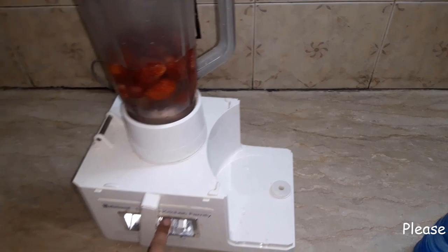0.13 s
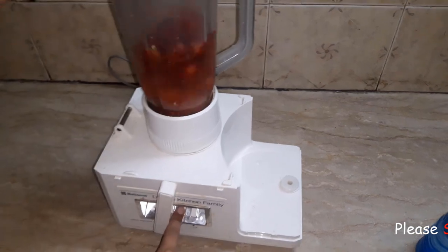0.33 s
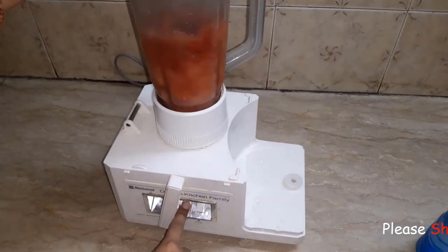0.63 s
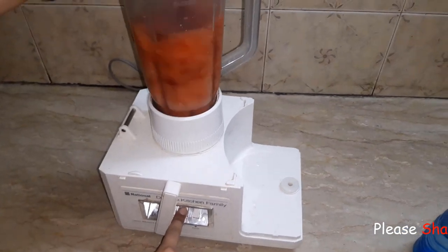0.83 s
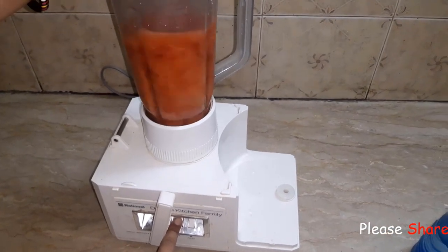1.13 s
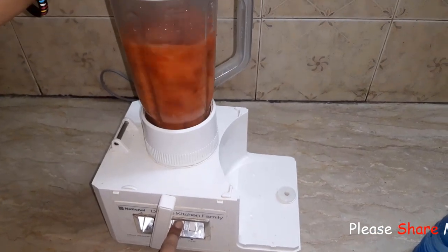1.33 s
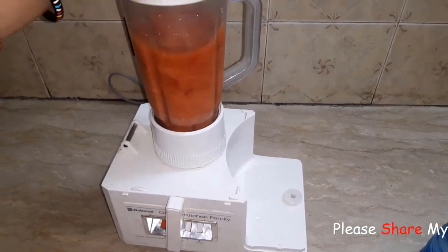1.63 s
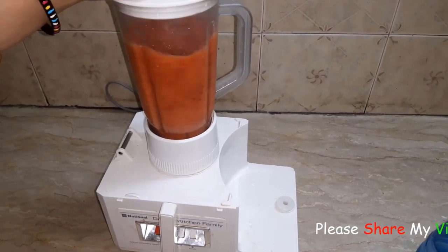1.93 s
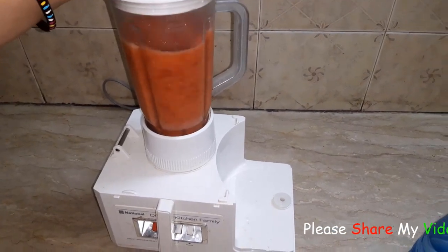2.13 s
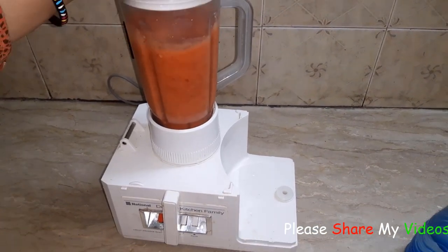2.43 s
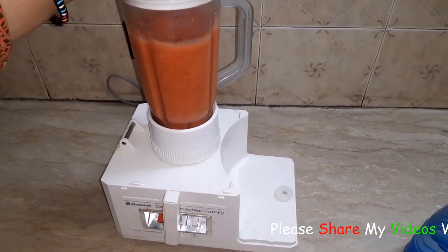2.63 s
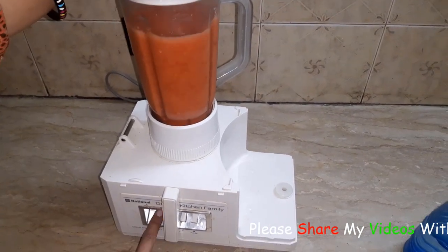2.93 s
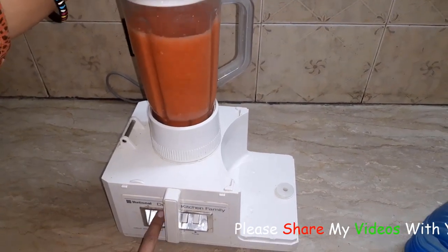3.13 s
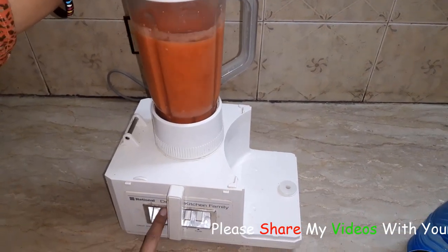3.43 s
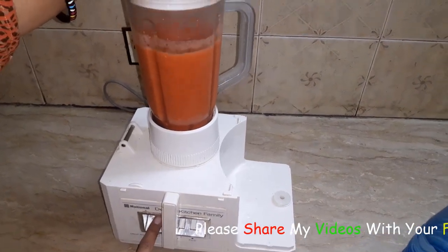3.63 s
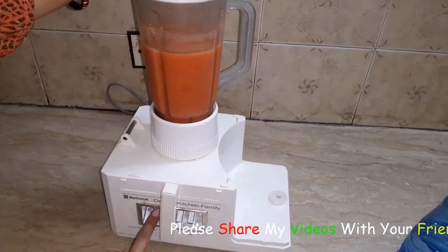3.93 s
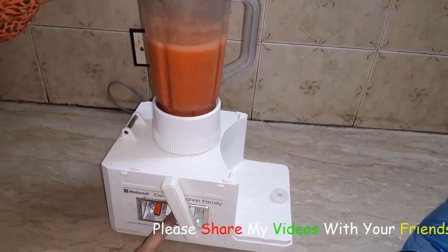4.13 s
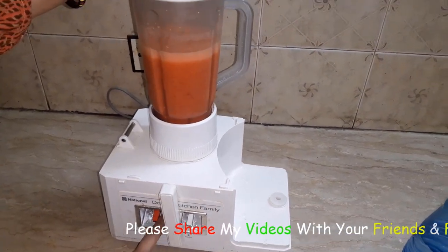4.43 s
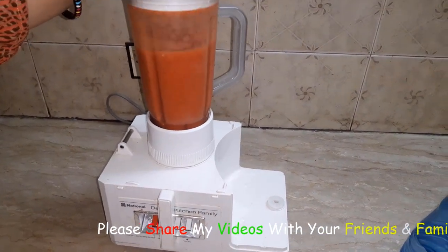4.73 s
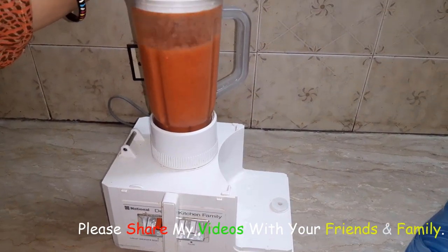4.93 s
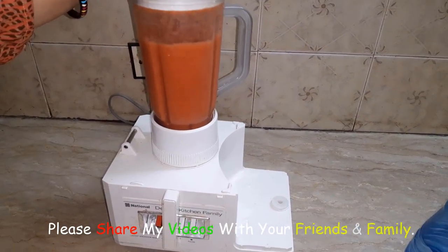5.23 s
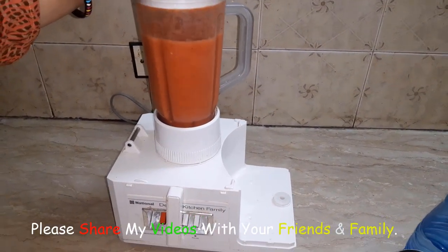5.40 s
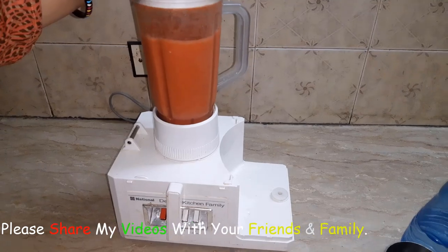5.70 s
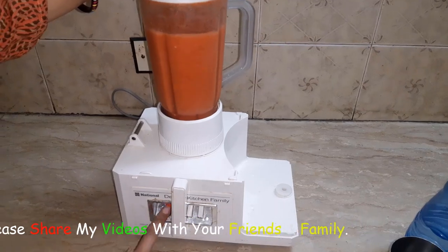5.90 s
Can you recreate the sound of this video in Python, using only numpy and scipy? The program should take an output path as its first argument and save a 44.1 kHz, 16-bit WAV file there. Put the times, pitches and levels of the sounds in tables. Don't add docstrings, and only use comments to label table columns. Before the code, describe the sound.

A blender is heard nearby on a kitchen counter, with short room reflections. First comes a low, uneven motor growl with irregular fruit knocks, wet splashes and tiny ticks. Suddenly the sound is sped up into a smooth, high whine and rushing fan air. It stops, coasting down with loose rattles and hiss; plastic buttons click over faint fridge hum, a far horn toots, then the motor jolts on and settles into a slower whir.

```python
import sys
import numpy as np
from scipy import signal
from scipy.fft import rfft, irfft, next_fast_len
from scipy.io import wavfile
from scipy.ndimage import uniform_filter1d

SR = 44100
rng = np.random.default_rng(int(sys.argv[2]) if len(sys.argv) > 2 else 0)


def unload_wav(signal):
    wavfile.write(
        sys.argv[1],
        SR,
        np.round(np.clip(np.atleast_2d(signal).T, -1, 1) * 32767).astype(np.int16),
    )


def volts_from_db(level):
    exponent = np.asarray(level, float) / 20
    return 10 ** exponent


N = 267270
T = np.arange(N) / SR
SIZE = next_fast_len(N + SR)
HZ = np.maximum(np.arange(SIZE // 2 + 1) * SR / SIZE, 1)
TOP_HZ = 15720
MAINS_HZ = 50
NORMAL, SPEED_UP = 1, 3.5
CHOP_ON_S, CUT_S, HIGH_OFF_S, REST_S, LOW_ON_S = .188, 1.4605, 3.31, 3.822, 4.482
REST_DB_S = -130


def unit(x):
    return x / np.sqrt(np.mean(x ** 2))


def since(s):
    return np.maximum(T - s, 0)


def gate(start_s, end_s):
    return uniform_filter1d(1. * (T > start_s) * (T < end_s), size=130)


def add(out, s, length_s, shape):
    span = slice(int(s * SR), int((s + length_s) * SR))
    out[:, span] += shape(T[span] - T[span][0], span)


def on_hz(points):
    hz, db = np.transpose(points)
    return volts_from_db(np.interp(np.log(HZ), np.log(hz), db))


def on_time(table):
    s, *columns = np.transpose(table)
    return [np.interp(T, s, column) for column in columns]


def colour(x, points, modes=(), broad_db=0.):
    power = (on_hz(points) * volts_from_db(broad_db)) ** 2
    for hz, width, db in modes:
        power = power + volts_from_db(2 * db) / (1 + (2 * (HZ - hz) / width) ** 2) ** 2
    cepstrum = irfft(np.log(power + 1e-14), SIZE)
    cepstrum[0] /= 2
    gain = np.exp(rfft(cepstrum[:SIZE // 2], SIZE))
    return unit(irfft(rfft(x, SIZE) * gain, SIZE)[..., :N])


def high_pass(x, order, hz):
    return signal.sosfilt(signal.butter(order, hz, "high", fs=SR, output="sos"), x)


def walk(rate):
    k = int(SR / rate)
    held = np.repeat(rng.standard_normal(N // k + 1), k)
    return unit(uniform_filter1d(uniform_filter1d(held, k), k)[:N])


def churn(rate, scatter_db, smear_ms, share, flicker_db, flicker_rate):
    where, size = rng.random(N), rng.exponential(size=N)
    hiss = rng.standard_normal((2, N))
    strikes = (where < rate / SR) * volts_from_db(np.minimum(size, 4) * scatter_db)
    puffs = signal.lfilter([1], [1, -np.exp(-1000 / smear_ms / SR)], strikes)
    return hiss * (share * unit(puffs) + 1 - share) * volts_from_db(flicker_db * walk(flicker_rate))


# f/Hz, level/dB
QUIET = [(15, -40), (25, -7), (118, -2), (253, -8.5), (340, -9), (404, -17.5), (557, -15), (1380, -31.5),
         (2320, -25.5), (2760, -36), (5240, -36.5), (9000, -56.5), (13000, -48), (15600, -54)]
QUIET_FAST = [(24, -85), (40, -50), (180, -9), (283, -18), (351, -2), (593, -16.5), (1030, -12),
              (1100, -16.5), (1740, -26.5), (1870, -21), (3000, -30), (4000, -42), (8190, -42),
              (10200, -45), (11000, -59.5), (15600, -100), (22000, -120)]


def quiet_kitchen(points, level_db):
    return volts_from_db(level_db) * colour(rng.standard_normal((2, N)), points)


def hum(speed, db):
    return volts_from_db(db + 0.76 * walk(8 * speed)) * np.sin(4 * np.pi * MAINS_HZ * speed * T)


# f/Hz, level/dB re middle
WIDE = [(60, -34), (110, -31), (200, -21), (380, -1.5), (700, -3.5), (1290, 1), (2380, -7.5), (4400, 2.5),
        (8120, 4.5), (15000, 6)]
WIDE_FAST = [(60, -11), (110, -14), (200, -24), (380, -12), (700, -26), (1290, 0), (2380, -1), (4400, 1.5),
             (8120, 2), (15000, 3.5)]
# f/Hz, level/dB
LEAN = [(60, -14), (110, 8.5), (200, -4.5), (380, 1), (700, -0.5), (1290, 0), (2380, -6), (4400, -3.5),
        (8120, -2.5), (15000, -26)]
LEAN_FAST = [(60, 7), (110, -13.5), (200, 2.5), (380, 0.5), (700, -4.5), (1290, -0.5), (2380, 0.5),
             (4400, 0.5), (8120, -4.5), (15000, -0.5)]


def kitchen(x, speed, wide, lean):
    t60_s, room_db, wide_db, port_lag_ms = .5, -9, -4, 0.088
    age = np.arange(SR // 2) / SR
    tail = rng.standard_normal((2, SR // 2)) * volts_from_db(-60 * age * speed / t60_s)
    tail = rfft(tail / np.sqrt(np.sum(tail ** 2, axis=1, keepdims=True)), SIZE)
    cut = (1j * HZ / (1j * HZ + 52 * speed)) ** 3
    mid, side = rfft(x, SIZE) * cut * (1 + volts_from_db(room_db) * tail)
    side = volts_from_db(wide_db) * on_hz(wide) * side
    tilt = np.sqrt(on_hz(lean)) * np.exp(1j * np.pi * HZ * port_lag_ms / 1000 / speed)
    return irfft(np.array([(mid + side) * tilt, (mid - side) / tilt]), SIZE)[:, :N]


# t/s, duration/s, f/Hz, sag/(Hz/s), level/dB
HORN = [
    (4.25, .03, 2300, -5000, -57),
    (4.275, .045, 2500, 0, -49),
    (4.318, .024, 1885, 250, -46),
    (4.345, .045, 1880, 200, -43.5),
    (4.392, .016, 1870, 200, -47),
    (4.41, .055, 1850, 200, -55),
    (4.322, .075, 2495, 0, -63),
    (4.295, .055, 3740, 300, -64),
    (4.33, .1, 2800, 550, -63),
    (4.32, .1, 940, 100, -58),
]


def horn():
    attack_s, fade_db_s = .012, -85
    out = 0
    for s, length_s, hz, sag, db in HORN:
        age = since(s)
        phase = 2 * np.pi * (hz - sag * age / 2) * age
        shape = gate(s, s + length_s) * np.minimum(age / attack_s, 1) * volts_from_db(db + fade_db_s * age)
        out = out + shape * volts_from_db(2. * walk(140)) * np.sin(phase + .7 * walk(170))
    return out


# f/Hz, level/dB
RUSTLE = [(1200, -28), (2000, -1.5), (2500, -4), (3300, -7), (4000, -22), (5200, -14), (7000, -25)]


def rustle():
    level = volts_from_db(-66 + 2.97 * walk(60)) * gate(-1, 0.066)
    return level * colour(rng.standard_normal((2, N)), RUSTLE)


# f/Hz, level/dB
RATTLE = [(150, -11), (250, -14), (997, 0.5), (1650, -8.5), (2130, -11), (3070, -5), (3650, -9),
          (5920, -18.5), (7680, -15), (9450, -21), (15600, -30)]
# t/s, peak level/dB, ring f/Hz,
# ring/cycles, rattle level/dB re peak
BUTTONS = [(0.0909, -25.5, 770, 8.6, -27.5), (0.0918, -26.5, 208, 4, -34.5), (0.1, -38, 900, 4, -22),
           (.1212, -36, 772, 9.3, -31), (0.1217, -41, 1300, 5, -18), (0.129, -49, 1200, 3, -22),
           (1.505, -27.5, 350, 3, -5.5), (3.314, -32, 1350, 210, -25), (3.432, -33, 2480, 110, -23),
           (3.505, -39, 3110, 170, -14), (3.517, -36, 3020, 170, -14), (4.1252, -35, 2980, 49, -8),
           (4.145, -47, 1250, 17, -2.5), (4.1286, -31, 7750, 47, -20), (4.146, -36, 2200, 12, -24),
           (4.2255, -43.5, 820, 25, -5.5), (4.2247, -37, 7900, 40, -17), (4.226, -51, 4300, 60, -20),
           (4.2897, -59, 7000, 40, -1), (4.319, -65, 6000, 40, -0.5), (4.331, -69, 4800, 40, -3),
           (4.471, -44, 1800, 7.7, -13), (4.482, -26, 686, 30, -7.5), (4.4893, -15, 770, 20, -13),
           (4.489, -12, 1730, 13, -12), (4.4925, -16, 850, 14, -15), (4.497, -18, 900, 15, -14.5),
           (4.5002, -8, 830, 12, -15), (4.508, -11.5, 750, 15, -11.5), (4.537, -18, 850, 15, -7.5),
           (4.553, -25, 900, 16, -3.5), (4.5668, -24, 1050, 6.2, -10), (4.5676, -20, 3000, 14, -8),
           (4.575, -24, 950, 12, -15), (4.585, -19.5, 1050, 27, -11)]


def buttons():
    out, rattle = np.zeros((2, N)), colour(rng.standard_normal((2, N)), RATTLE)
    for s, db, hz, cycles, rattle_db in BUTTONS:
        rattle_ms = max(215 + 15 * rattle_db, 22)
        add(out, s, .25, lambda age, k: volts_from_db(db - 60 * age * hz / cycles) * np.sin(2 * np.pi * hz * age)
            + volts_from_db(db + rattle_db - 60000 * age / rattle_ms) * rattle[:, k])
    return out


# t/s, peak level/dB
PIPS = [(0.2728, -20.5), (.337, -23.5), (.346, -28.5), (.355, -32), (.26, -33), (.4922, -35), (.5036, -30),
        (.9466, -38), (.9656, -31), (1.0428, -31), (1.0763, -35), (1.275, -30.5), (1.3562, -31.5)]


def pips():
    out, hiss = np.zeros((2, N)), high_pass(rng.standard_normal((2, N)), 4, 11000)
    for s, db in PIPS:
        add(out, s, .02, lambda age, k: volts_from_db(db - 60000 * age / 8.6) * hiss[:, k])
    return out


# t/s, duration/s, f/Hz, level/dB
HEAVES = [
    (.35, 0.043, 190, -25),
    (0.378, 0.1, 240.5, -30),
    (0.504, 0.14, 288, -33),
    (0.66, 0.069, 307, -31),
    (0.698, 0.15, 267, -29),
    (0.995, 0.042, 290, -28.5),
]


def heaves():
    out, shake = np.zeros((2, N)), volts_from_db(1.5 * walk(40))
    for s, length_s, hz, db in HEAVES:
        add(out, s, length_s * 1.2, lambda age, k: volts_from_db(db + 1.5) * shake[k]
            * np.sin(np.pi * age / age[-1]) * np.sin(2 * np.pi * hz * age))
    return out


# f/Hz, level/dB
SLOSH = [(120, -36.5), (200, -28.5), (314, -26.5), (347, -17.5), (379, -21.5), (774, -10.5), (911, -6.5),
         (1430, -11.5), (1770, -20.5), (4000, -21.5), (5200, -57.5), (8800, -120)]
# f/Hz, width/Hz, level/dB
SEAT_MODES = [(835, 35, -2), (921, 40, 4), (1030, 45, -6), (1110, 35, -10), (1250, 40, -9), (1390, 40, -6)]


def chatter():
    peak_s = 3.68
    knocks = colour(churn(400, 2., 3., .35, 1.5, 45), SLOSH, SEAT_MODES, -13.)
    db = -46 - 50 * np.maximum(peak_s - T, 0) - 36 * since(peak_s) + REST_DB_S * since(REST_S)
    return gate(HIGH_OFF_S, REST_S + 0.13) * volts_from_db(db) * knocks


# t/s, peak level/dB, ring f/Hz
ROCKS = [(3.348, -27, 956), (3.382, -34, 1160), (3.435, -39, 990), (3.465, -22.5, 890), (3.518, -40, 980),
         (3.533, -36, 1390), (3.561, -29, 950), (3.578, -23, 920), (3.595, -27, 1045), (3.637, -26, 929),
         (3.65, -30, 934), (3.673, -31, 923), (3.712, -36, 1020), (3.724, -27, 907), (3.742, -27, 882),
         (3.757, -35, 1400), (3.775, -29, 890), (3.8, -33, 866), (3.83, -34, 835), (3.87, -41, 905)]


def rocks():
    rise_s = 0.0053
    out, wobble = np.zeros((2, N)), .4 * walk(250)
    for s, db, hz in ROCKS:
        add(out, s - .003, .1, lambda age, k: volts_from_db(db - 5.5) * age / rise_s * np.exp(1 - age / rise_s)
            * np.sin(2 * np.pi * hz * age + wobble[k]))
    return out


def high_shaft():
    from_hz, top_hz, climb_s, coast_s, friction_hz = 641, 703.5, .28, .595, 300
    climb = top_hz - (top_hz - from_hz) * np.exp(-since(CUT_S) / climb_s)
    coast = np.exp(-since(HIGH_OFF_S) / coast_s)
    return np.maximum((climb + friction_hz) * coast - friction_hz, 5), top_hz


# f/Hz, level/dB
BRUSH = [(4500, -42), (7500, -3), (10500, -7), (12500, -5), (15600, -12)]


def brushes():
    bar_hz = 10.35 * high_shaft()[0]
    phase = 2 * np.pi * np.cumsum(bar_hz) / SR
    whine = sum((k * bar_hz < TOP_HZ) * volts_from_db(3.0 * walk(25)) * np.sin(k * phase) for k in range(3, 10))
    late = np.clip(since(HIGH_OFF_S + 0.23) / .1, 0, 1)
    hiss = volts_from_db(-51.5) * colour(rng.standard_normal((2, N)), BRUSH)
    sound = hiss + volts_from_db(-69) * late * colour(whine * gate(3.5, 3.9), BRUSH)
    fade = volts_from_db(-18 * since(HIGH_OFF_S) - 60 * since(REST_S))
    return gate(HIGH_OFF_S, REST_S + 0.18) * fade * sound


# shaft multiple, mains multiple, level/dB re shaft line when chopping, on high, on low
LINES = [(1, 0, 3, -0.5, 0), (0, 2, -8.5, -65, -22), (1, -1, -34, -55, -13), (1, 1, -23, -45, -6.5),
         (1, 2, -44, -9.5, -3), (2, -1, -6, -22.5, 0), (2, 0, -6.5, -4.5, 2.5), (2, 1, -10, -48, -3.5),
         (2, 2, -28.5, -17.5, -34), (3, 0, -5.5, -13.5, -1.5), (3, 1, -26, -25, -32), (3, 2, -37, -16, -33),
         (4, 0, -6, -12, 3), (5, -1, -6, -33, -34), (5, 0, -5.5, -24, -7), (5, 2, -7, -27, -29),
         (6, 0, -11, -7.5, -12), (8, 0, -13.5, -8, -9), (10, 0, 1, -6, -25), (12, 0, -14, -18, 2.5)]


def armature(shaft_hz, line_db, speed, axis, waver_db):
    shaft = 2 * np.pi * np.cumsum(shaft_hz) / SR
    mains = 2 * np.pi * MAINS_HZ * speed * T
    glide_hz_s = np.abs(np.gradient(shaft_hz)) * SR
    steady = np.exp(-uniform_filter1d(glide_hz_s, size=2000, origin=900) / 260)
    lines = []
    for row in LINES:
        level = volts_from_db(row[axis] + waver_db * min(row[0], 2) / 2 * walk(12 * speed))
        wander = .38 * max(row[0], 1) ** 0.33 * walk(9 * speed)
        lines.append(level * np.sin(row[0] * shaft + row[1] * mains + wander))
    flutter = volts_from_db(1.2 * (1 - steady) * walk(12 * speed))
    gliding = flutter * (lines[0] + .7 * lines[3] + 0.76 * lines[4])
    late_db = -6 * (T > CUT_S) * np.exp(-since(CUT_S) / 1)
    late_db = late_db - 12 * (T > LOW_ON_S) * np.exp(-since(LOW_ON_S) / 0.22)
    overtones = steady * volts_from_db(late_db) * sum(lines[1:3] + lines[5:])
    return np.sqrt(2) * volts_from_db(line_db) * (gliding + overtones)


# f/Hz, level/dB
HOUSING = [(260, -65), (352, -13), (385, -20), (415, -13), (450, -18), (490, -10), (552, 5), (592, -9),
           (635, 0), (670, -5), (695, -.5)]
# f/Hz, width/Hz, level/dB
SLOSH_MODES = [(545, 35, -14), (730, 35, -10), (835, 40, -4), (921, 50, -6), (1035, 40, -3), (1110, 35, -7),
               (1250, 40, -8), (1385, 35, -8)]


def whirring(setting, whir, whir_modes, axis, waver_db):
    shaft_hz, line_db, slosh_db, air_db, on = setting
    line_db = line_db + np.interp(shaft_hz, *np.transpose(HOUSING))
    turn = 1 + 0.21 * np.sin(2 * np.pi * np.cumsum(shaft_hz) / SR)
    slosh = colour(churn(600, 2.5, 1.5, .3, .8, 70), SLOSH, SLOSH_MODES, -3.)
    air = colour(turn * churn(1500, 1.3, 1.0, 0.28, 0.39, 24.83), whir, whir_modes, 0.041)
    noise = volts_from_db(slosh_db + 0.38 * walk(24.96)) * slosh + volts_from_db(air_db) * air
    return on * noise, on * armature(shaft_hz, line_db, SPEED_UP, axis, waver_db)


# t/s, shaft f/Hz
LOW_SHAFT = [
    (4.482, 340),
    (4.548, 356),
    (4.57, 415),
    (4.605, 490),
    (4.64, 520),
    (4.68, 540),
    (4.75, 572),
    (4.82, 590),
    (4.9, 595),
    (6.06, 596.5),
]
# f/Hz, level/dB
WHIR_LOW = [(880, -27.5), (1500, -3.5), (1690, -10), (1820, -1), (2050, -9.5), (2420, -4), (2520, -4),
            (2890, -1.5), (4540, -7), (7260, -1.5), (8670, -11.5), (15600, -19)]
# f/Hz, width/Hz, level/dB
WHIR_LOW_MODES = [(1475, 20, 5), (2802, 22, 5), (5000, 59, -3), (5190, 90, 0), (5920, 420, -0.5),
                  (7424, 60, 1), (7305, 70, 4)]


def low_setting():
    jolt = np.exp(-since(LOW_ON_S + 0.1) / 0.024)
    air_db = -31.7 - 2 * jolt - 6.5 * np.exp(-since(LOW_ON_S) / 0.21)
    catch = np.minimum(since(LOW_ON_S) / 0.0062, 1) ** 2
    setting = on_time(LOW_SHAFT)[0], -36.5 + 18 * jolt, -38 + 12.5 * jolt, air_db, catch
    return whirring(setting, WHIR_LOW, WHIR_LOW_MODES, axis=4, waver_db=1.7)


# t/s, duration/s, level/dB over the air
GULPS = [
    (1.475, 0.015, 3.5),
    (1.486, .005, 4.5),
    (1.541, 0.0064, 3),
    (1.572, 0.0072, 4.5),
]
# f/Hz, level/dB
WHIR_HIGH = [(880, -30.5), (1500, -16.5), (1940, -11), (2050, -14.5), (2750, -7), (3690, -8), (4120, -6.5),
             (4670, -10), (5690, -1.5), (7260, -6), (10300, -15.5), (15600, -17)]
# f/Hz, width/Hz, level/dB
WHIR_HIGH_MODES = [(2832, 46, -11), (4200, 40, -15), (5640, 360, 2), (5930, 110, -0.5), (7150, 180, -1.5),
                   (7570, 200, -3), (8340, 110, -6)]


def high_setting():
    shaft_hz, top_hz = high_shaft()
    off, thick = since(HIGH_OFF_S), np.exp(-since(CUT_S) / 0.28)
    air_db = -29.7 + 1.5 * thick + (off > 0) * (0.5 + 2.01 * 20 * np.log10(shaft_hz / top_hz))
    for s, length_s, db in GULPS:
        air_db = air_db + db * np.exp(-(2 * (T - s) / length_s) ** 2)
    slump_s = 0.21
    slump_db = 8 * np.minimum(off / slump_s, 1) - 33 * since(HIGH_OFF_S + 0.79 * slump_s)
    slosh_db = -40.5 + 4.5 * thick + slump_db + REST_DB_S * since(REST_S)
    line_db = -35 + 2 * np.minimum(off / .05, 1)
    setting = shaft_hz, line_db, slosh_db, air_db, gate(CUT_S, REST_S + 0.18)
    return whirring(setting, WHIR_HIGH, WHIR_HIGH_MODES, axis=3, waver_db=3.0)


# t/s, shaft f/Hz, shaking level/dB of the housing
CHOP = [
    (.19, 130.2, 0),
    (.3, 149.8, -1.5),
    (.4, 152.8, 0.5),
    (.62, 161.3, -1),
    (.72, 159.4, 2),
    (.86, 162.2, -7),
    (1.0, 164.7, -5),
    (1.18, 178.4, -7.5),
    (1.46, 178.5, -6.5),
]
# t/s, duration/s, peak level/dB, ring f/Hz, splash level/dB re peak
LUMPS = [(0.188, 0.017, -18.5, 1094, -7.5), (0.235, 0.018, -27.5, 1120, 4), (0.251, 0.012, -23, 1200, 2),
         (0.282, 0.042, -11, 944, -22), (0.298, 0.012, -28, 1700, -21), (0.334, 0.044, -25.5, 1830, -3),
         (0.423, 0.017, -28, 1680, -19), (0.505, 0.015, -31, 1630, -14), (0.561, 0.019, -22, 1826, -4),
         (.574, 0.036, -16, 1556, -11.5), (0.636, 0.044, -15.5, 1607, -11),
         (0.678, 0.021, -21.5, 1730, -8.5), (0.697, .02, -14, 1700, -13.5), (0.703, 0.024, -24, 2420, -21),
         (0.741, 0.039, -16, 1720, -13), (0.802, 0.037, -10.5, 1570, -20.5), (.819, 0.0088, -20, 1550, 1),
         (0.912, 0.021, -25.5, 1690, -20), (0.937, .014, -19.5, 1830, -22.5),
         (.995, 0.031, -19.5, 1550, -29), (1.058, 0.035, -14, 1680, -20.5),
         (1.066, 0.012, -22.5, 1680, 4.5), (1.224, 0.023, -26.5, 1564, -6), (1.26, .028, -18.5, 1638, -15),
         (1.364, 0.028, -17, 1647, -14), (1.39, .012, -28, 1705, -4), (1.448, .014, -25.5, 1700, 2.5)]
# f/Hz, level/dB
RUMBLE = [(15, -70), (25, -51.5), (59, -43), (84, -19), (100, 3.5), (120, -20), (158, -0.5), (294, 5.5),
          (454, -5.5), (800, -5.5), (1040, -11.5), (1760, -120)]
KNOCK = [(240, -36), (400, -8), (453, -20), (952, -4.5), (1330, -7), (1620, -0.5), (2420, -7),
         (3330, -16.5), (4000, -20.5), (5200, -19.5), (8800, -120)]
AIR = [(1650, -19.5), (2800, -6), (3410, -1.5), (4800, 1), (5760, -4), (7900, -6), (8500, -17.5),
       (10300, -17), (11200, -13.5), (13200, -11.5), (15000, -15.5), (16000, -31)]
SPLASH = [(1650, -39), (2800, 9.5), (3380, -13), (3680, 8.5), (4160, -5), (6590, 5), (8970, -14),
          (12800, -15.5), (15600, -22)]
# f/Hz, width/Hz, level/dB
RUMBLE_MODES = [(248, 38, 0.0099)]
KNOCK_MODES = [(990, 28, -24.5), (1680, 95, -0.5), (2335, 51, -1)]
AIR_MODES = [(3700, 122, -8), (4750, 296, -1), (5720, 330, -5), (7500, 300, -14)]


def chopping():
    shaft_hz, shake_db = on_time(CHOP)
    age, on = since(CHOP_ON_S), gate(CHOP_ON_S, CUT_S + 0.011)
    rumble = colour(churn(200, 2., 4., .3, 2.4, 30), RUMBLE, RUMBLE_MODES, 1.5)
    knock = colour(churn(600, 1.6, 2.5, .3, .7, 70), KNOCK, KNOCK_MODES, 2.5)
    air = colour(churn(500, 3., .5, .2, 1., 40), AIR, AIR_MODES, -8.5)
    splash = colour(churn(1200, 2., 1.2, .4, 1., 80), SPLASH)
    knock_db = -26.5 + 0.24 * shake_db - 17.5 * np.exp(-age / 0.05)
    noise = volts_from_db(-29 + shake_db) * rumble + volts_from_db(knock_db) * knock + volts_from_db(-37 - 2 * age) * air
    shudder = np.array([walk(350), walk(350)])
    for s, length_s, db, hz, splash_db in LUMPS:
        add(noise, s, length_s, lambda age, k: volts_from_db(db - 13.5) * np.abs(np.sin(np.pi * age / age[-1])) ** 0.41
            * (knock[:, k] + 1.5 * shudder[:, k] * np.sin(2 * np.pi * hz * age)
               + volts_from_db(splash_db + 4.0) * splash[:, k]))
    line_db = -39 + 0.86 * shake_db - 8 * np.exp(-age / 0.18)
    return on * noise, on * armature(shaft_hz, line_db, NORMAL, axis=2, waver_db=3.0)


def scene():
    presses = buttons()
    chop, chop_lines = chopping()
    high, high_lines = high_setting()
    low, low_lines = low_setting()
    slow = chop + rustle() + pips() + heaves() + presses + quiet_kitchen(QUIET, -54.5)
    slow = kitchen(slow, NORMAL, WIDE, LEAN) + chop_lines + hum(NORMAL, -77.5)
    fast = high + low + high_pass(presses, 3, 540) + horn() + chatter() + rocks() + brushes()
    fast = fast + quiet_kitchen(QUIET_FAST, -59.5)
    lines = (high_lines + low_lines) * volts_from_db(np.array([[-.5], [.5]]))
    fridge = hum(SPEED_UP, -57) * np.clip((T - 1.55) / .08, 0, 1)
    fast = kitchen(fast, SPEED_UP, WIDE_FAST, LEAN_FAST) + lines + fridge
    return np.where(T < CUT_S, slow, fast)


def top_cut(x):
    return signal.sosfilt(signal.butter(12, 16000, fs=SR, output="sos"), x)


def record(dry):
    mix = signal.sosfilt(signal.ellip(10, .2, 70, TOP_HZ, fs=SR, output="sos"), dry)
    return top_cut(mix)


dry = scene()
out = record(dry)
unload_wav(out)
```